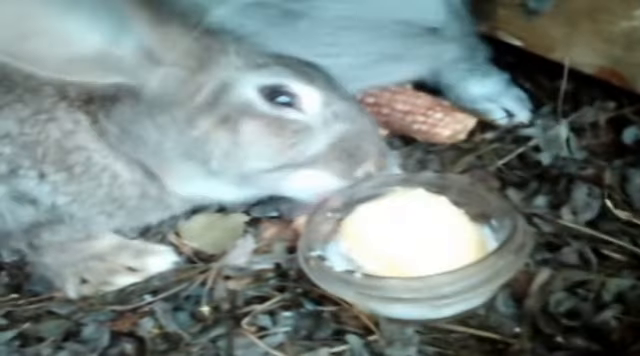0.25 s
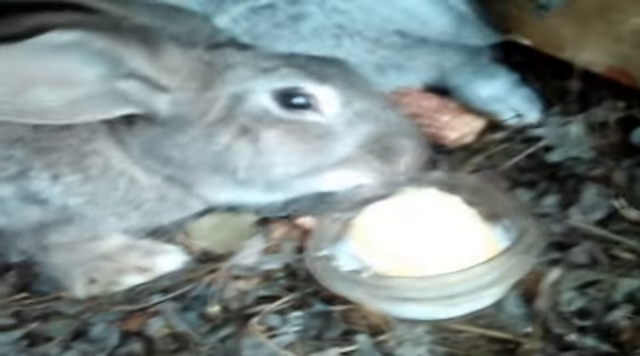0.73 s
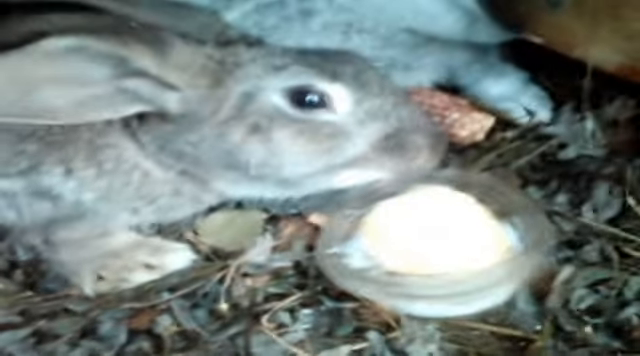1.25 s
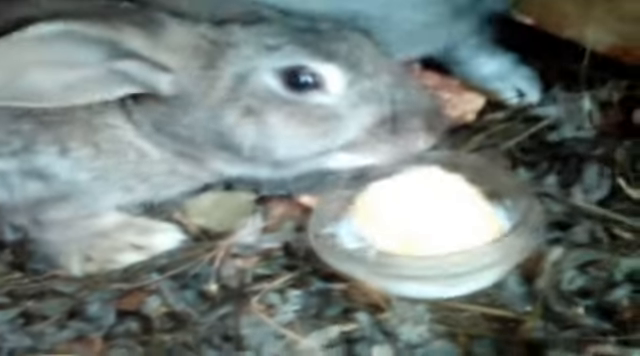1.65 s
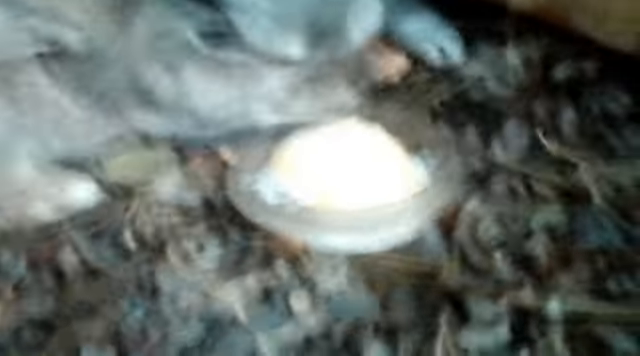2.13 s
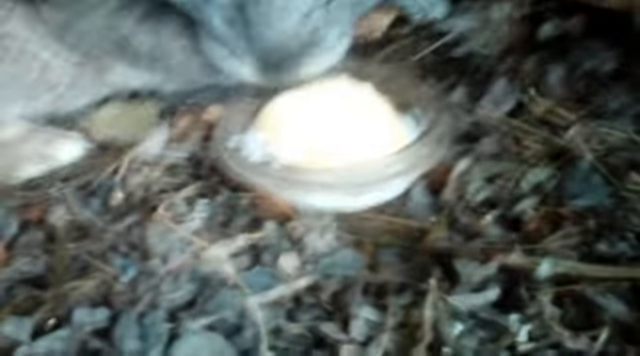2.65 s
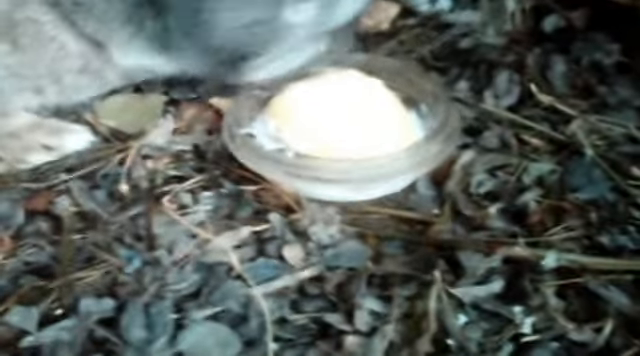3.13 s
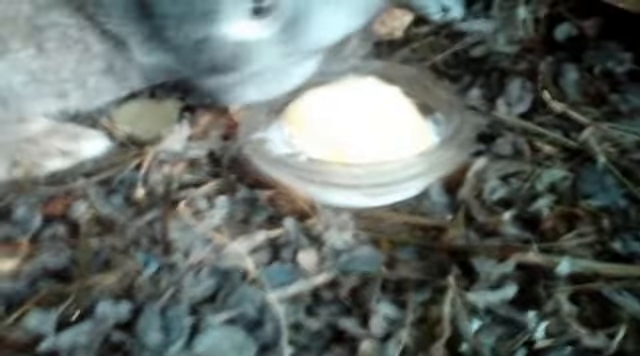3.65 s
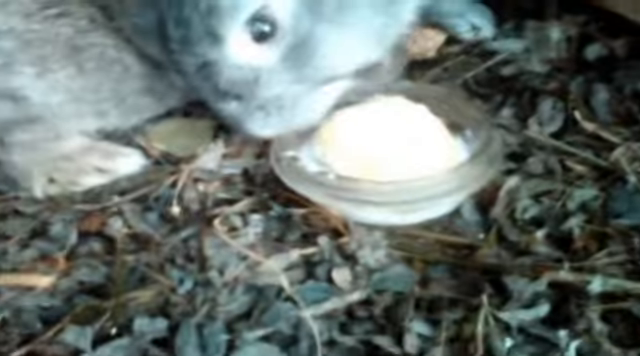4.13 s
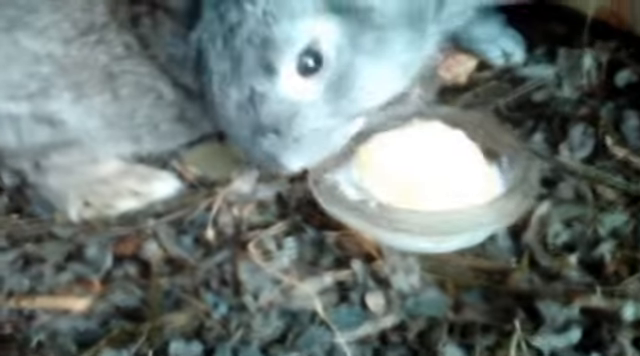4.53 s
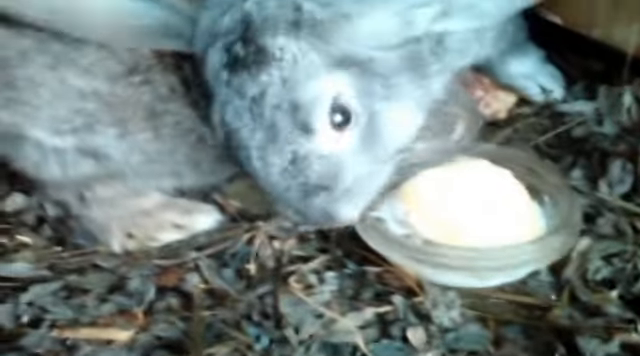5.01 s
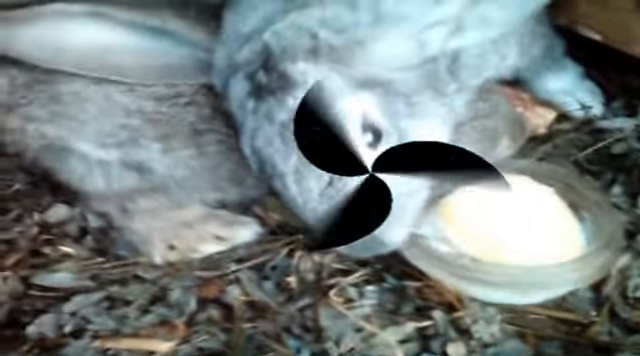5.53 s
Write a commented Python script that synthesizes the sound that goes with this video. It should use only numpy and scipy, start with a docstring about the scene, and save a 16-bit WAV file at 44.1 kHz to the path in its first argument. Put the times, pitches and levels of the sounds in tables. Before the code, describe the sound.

Rabbits gnaw a hard block in a glass dish, with close, dry, scratchy crunching and a few sharp clicks.

```python
"""On leaf litter outdoors, two rabbits gnaw at a salt block in a glass dish, very close to a small camera.
Dry strokes are stick-slip friction: trains of tiny slips swell and fade through a few broad resonances,
as crunchy scrapes, hollow rasps and light swishes. Between them hard edges snap and blunt contacts knock,
some with a brief ring. Faint ticks and soft low thumps sound over quiet air and microphone hiss."""
import sys
import numpy as np
from scipy import signal
from scipy.fft import rfft, irfft, next_fast_len
from scipy.io import wavfile
from scipy.ndimage import map_coordinates

SR = 44100
rng = np.random.default_rng(int(sys.argv[2]) if len(sys.argv) > 2 else 0)


def unload_audio(sound):
    """Save the sound as a 16-bit wav file, at the path given as the first command line argument."""
    columns = np.transpose(np.atleast_2d(sound))
    # keep every value between -1 and 1, then stretch to whole-number steps
    steps = np.round(np.clip(columns, -1, 1) * 32767)
    wavfile.write(sys.argv[1], SR, steps.astype(np.int16))


N = 254456

# Dry, crunchy scrapes: start_s, length_s, grinding_db, brightness_db (hiss over grinding)
CRUNCH_STROKES = [(1.278, 0.041, -53, 2.5), (1.345, 0.05, -56, 4.5), (1.476, 0.059, -48.5, 8),
                  (1.526, 0.058, -56.5, 2), (1.588, 0.045, -51, 4), (1.628, 0.085, -57, 5),
                  (1.694, 0.05, -52.5, 10.5), (1.73, 0.056, -56, 5), (1.958, 0.093, -60.5, 4.5),
                  (2.263, 0.097, -46.5, -7), (2.313, 0.14, -49.5, -2), (2.428, .09, -50.5, -2.5),
                  (2.505, 0.11, -48.5, -4), (2.528, 0.064, -53.5, 11), (3.026, 0.057, -45.5, 4),
                  (3.048, 0.0091, -38, 4), (3.0725, 0.05, -30, 5), (3.101, 0.052, -39.5, 1),
                  (3.246, 0.067, -54, 2), (3.272, 0.069, -54, 11)]
# Spectra of their resonances and of their hiss: frequency_hz, gain_db
CRUNCH_RESONANCES = [(290, -27.5), (500, -22.5), (707, -18.5), (891, 4), (981, -2.5), (1040, -6),
                     (1530, 2.5), (1850, -5), (2060, -6), (2310, -14), (2860, -7.5), (3670, -8),
                     (4500, -20), (5000, -13), (6500, 1), (11000, -120)]
CRUNCH_HISS_SPECTRUM = [(4000, -12.5), (4600, -20.5), (7100, -6), (8200, -10.5), (9400, -20), (12000, -12),
                        (13800, -26), (15800, -29)]


def crunches():
    """Stick-slip friction: dry, crunchy scrapes close to the microphone, each catching early."""
    levels = stroke_envelopes(CRUNCH_STROKES, rise_share=0.25, scratch=(-0.73, 0.5), shudder=(-12.5, -0.88))
    return scrape(levels, CRUNCH_RESONANCES, CRUNCH_HISS_SPECTRUM, level_db=0, judder_db=1.5, spread_db=2)


# Rasping strokes: start_s, length_s, grinding_db, brightness_db
RASP_STROKES = [(2.06, 0.083, -64, -2.5), (2.632, 0.075, -60.5, 11), (2.678, .08, -57.5, 9),
                (2.785, .11, -56, 11.5), (2.861, .056, -47, 6), (2.898, 0.12, -55, 4.5),
                (2.967, 0.12, -53.5, 9.5), (3.138, 0.075, -51, 1.5), (3.326, 0.056, -52.5, 4),
                (3.48, 0.09, -54.5, 7.5), (3.56, 0.048, -56.5, 9.5), (3.625, 0.07, -50, 2.5),
                (3.669, 0.071, -43, 5), (3.822, 0.048, -58.5, -0.5), (3.953, .036, -58.5, 2.5),
                (4.006, .048, -60.5, -3), (4.1, 0.059, -61, 1), (4.365, .099, -69.5, 1.5),
                (5.696, 0.066, -61, 3)]
# Spectra of their resonances and of their hiss: frequency_hz, gain_db
RASP_RESONANCES = [(290, -61), (500, -38), (578, -11.5), (757, -16.5), (891, -2.5), (991, -5.5), (1190, -3),
                   (1420, -11.5), (1680, 4.5), (2140, -12), (2780, -8.5), (3430, -11.5), (3820, -5),
                   (5000, -15), (6500, -38), (11000, -120)]
RASP_HISS_SPECTRUM = [(2350, -51), (4000, -15), (4810, -13), (6260, -1), (7660, 0), (9690, -7.5),
                      (11300, -6), (13100, -20), (14800, -10.5), (15800, -36)]


def rasps():
    """Forced resonance: friction without judder drives midrange peaks, which sound hollow."""
    levels = stroke_envelopes(RASP_STROKES, rise_share=0.35, scratch=(-5.5, 0.18), shudder=(-21.5, 0.25))
    return scrape(levels, RASP_RESONANCES, RASP_HISS_SPECTRUM, level_db=0.2, judder_db=0, spread_db=1.5)


# Brushing strokes: start_s, length_s, grinding_db, brightness_db
SWISH_STROKES = [(.222, .026, -68, 14.5), (.685, 0.13, -66.5, 7.5), (.883, 0.063, -66.5, 8.5),
                 (1.752, 0.13, -55, 12), (1.874, .075, -54, 1.5), (1.903, 0.063, -45.5, 6.7),
                 (2.2, 0.085, -46, 3), (3.71, 0.086, -66.5, 5.5), (5.695, 0.057, -73, 18)]
# Spectra of their resonances and of their hiss: frequency_hz, gain_db
SWISH_RESONANCES = [(300, -22), (600, -11.5), (900, 0.5), (1150, -2.5), (1500, 1), (2300, -2.5), (3500, 7),
                    (4600, 3.5), (7000, 20)]
SWISH_HISS_SPECTRUM = [(4000, -5), (6500, 2), (9000, 1), (10300, -3), (12000, -5), (15800, -12.5)]


def swishes():
    """Light sliding friction: slips of nearly equal size blend into a swish that peaks late."""
    levels = stroke_envelopes(SWISH_STROKES, rise_share=0.7, scratch=(-1.3, 0.5), shudder=(-16, -0.87))
    return scrape(levels, SWISH_RESONANCES, SWISH_HISS_SPECTRUM,
                  level_db=-0.1, judder_db=1.3, spread_db=-0.5)


# Low shudder under every stroke: frequency_hz, gain_db
SHUDDER_SPECTRUM = [(40, -43), (90, -5), (220, -1), (340, -2), (480, -6.5), (800, -0.5), (1500, -59)]


def scrape(levels, resonances, hiss_spectrum, level_db, judder_db, spread_db):
    """Source and filter: one friction force excites four bands; judder is the contact catching."""
    force = reflected(slips(rate_hz=3500, spread_db=spread_db, rubbing=0.79), wall_db=-12.5, t60_s=0.032)
    judder = unit(amp(judder_db * np.tanh(wobble(190))))
    grinding = coloured(force, resonances, high_hz=2300)
    scratch = coloured(force, resonances, low_hz=2445, high_hz=4510)
    hiss = coloured(force, hiss_spectrum, low_hz=4630)
    shudder = coloured(force, SHUDDER_SPECTRUM)
    return amp(level_db) * judder * np.sum(levels * [grinding, scratch, hiss, shudder], axis=0)


def stroke_envelopes(strokes, rise_share, scratch, shudder):
    """Incoherent addition: strokes swell and fade in arches whose powers add in each of four bands."""
    t, power = np.arange(N) / SR, np.zeros((4, N))
    for start_s, length_s, grinding_db, brightness_db in strokes:
        active = (t > start_s) & (t < start_s + length_s)
        progress = (t[active] - start_s) / length_s
        arch = np.sin(np.interp(progress, [0, rise_share, 1], [0, np.pi / 2, np.pi]))
        # Each pair is (dB over the grinding, dB per dB of brightness).
        scratch_db = scratch[0] + scratch[1] * brightness_db
        shudder_db = shudder[0] + shudder[1] * brightness_db
        bands_db = grinding_db + np.array([0, scratch_db, brightness_db, shudder_db])
        power[:, active] += np.outer(amp(bands_db), arch) ** 2
    return np.sqrt(power)


def slips(rate_hz, spread_db, rubbing):
    """Shot noise: tiny slips of uneven size occur at random over smooth rubbing."""
    pulses = (rng.random(N) < rate_hz / SR) * rng.choice([-1, 1], N)
    sizes = amp(spread_db * np.clip(rng.standard_normal(N), -2, 2))
    return unit(unit(pulses * sizes) + rubbing * rng.standard_normal(N))


# Hard edges giving way: start_s, level_db
SNAP_EVENTS = [(1.2822, -14.5), (1.284, -30), (1.2975, -31), (1.478, -30), (1.4922, -17), (3.0091, -33)]
# Spectrum of a snap: frequency_hz, gain_db
SNAP_SPECTRUM = [(100, -11), (500, -9), (1000, -4), (1700, 0), (2400, -3), (3600, 3), (6000, 0.5),
                 (8000, -8), (11000, -21), (15500, -28)]


def snaps(rattle_db=-28, t60_s=0.013):
    """Brittle fracture: an edge gives way in one sharp pulse and a short rattle of crumbs."""
    track, t = np.zeros(N), np.arange(SR // 16) / SR
    for start_s, level_db in SNAP_EVENTS:
        force = amp(rattle_db - 60 * t / t60_s) * rng.standard_normal(len(t))
        force[0] = 1  # the break itself
        add(track, start_s, amp(level_db) * force)
    return signal.fftconvolve(track, impulse(SNAP_SPECTRUM))[:N]


# Blunt contacts: start_s, level_db, edge_db (relative to the thud)
KNOCK_EVENTS = [(3.009, -23, -8), (3.0108, -24.5, -11), (4.8463, -33.5, -36), (5.3519, -35.5, -38),
                (5.6984, -36.5, -24)]
# Modes that a knock excites: centre_hz, bandwidth_hz, gain_db
KNOCK_RESONANCES = [(195, 170, 13.5), (430, 240, 6.5), (910, 530, 6.5), (1700, 160, 8.5), (3320, 1000, -12)]


def knocks(rattle_db=-25, t60_s=0.062):
    """Impact excitation: a short push rings low, well damped modes, and grit adds a thin bright edge."""
    track, t = np.zeros(N), np.arange(SR // 16) / SR
    modes = lambda hz: sum(amp(db) * resonance(hz, centre, width) for centre, width, db in KNOCK_RESONANCES)
    for start_s, level_db, edge_db in KNOCK_EVENTS:
        grit = amp(-60 * t / t60_s) * rng.standard_normal(len(t))
        thud = filtered((t == 0) + amp(rattle_db) * grit, modes)
        thud /= np.abs(thud).max()
        edge = filtered(grit, lambda hz: gain(RASP_HISS_SPECTRUM, hz))
        add(track, start_s, amp(level_db) * (thud + amp(edge_db) * edge))
    return track


# Faint dry ticks, rustles and the brief high ring after a knock: start_s, level_db, pitch_hz, quality_factor
TICK_EVENTS = [(.076, -56, 6740, 3.7), (0.112, -49, 6730, 4), (0.119, -48, 7100, 2.8),
               (.236, -50, 6500, 0.96), (0.286, -53, 2900, .8), (.301, -47, 3500, 0.59),
               (.324, -52, 6000, 0.77), (0.35, -58, 7000, 0.81), (.426, -54, 7060, 0.84),
               (0.503, -54, 7350, 1), (.515, -53, 2730, 3.4), (.799, -57, 900, 1.3), (.916, -44, 7000, .8),
               (2.151, -50, 7250, 0.71), (4.015, -49, 5960, 0.88), (4.747, -60, 8350, 1.4),
               (4.852, -59, 3500, 3.5), (5.354, -56, 7150, 0.61)]


def ticks(attack_s=0.0008, reference_t60_s=0.047, reference_db=-52, halving_db=5.5):
    """Decaying resonant noise: a hard tick is short, a weak one lingers as a rustle or a brief ring."""
    track, t = np.zeros(N), np.arange(SR // 8) / SR
    for start_s, level_db, pitch_hz, quality in TICK_EVENTS:
        t60_s = reference_t60_s * 0.5 ** ((level_db - reference_db) / halving_db)
        band = lambda hz: resonance(hz, pitch_hz, pitch_hz / quality) ** 2
        crackle = unit(filtered(rng.standard_normal(len(t)), band))
        envelope = amp(level_db - 60 * t / t60_s) * (1 - np.exp(-t / attack_s))
        add(track, start_s, envelope * crackle)
    return track


# Soft low thumps and the low ring after two knocks: start_s, level_db (before the boost), pitch_hz, t60_s
THUMP_EVENTS = [(.294, -51.5, 85, 0.059), (0.425, -54, 84.4, 0.087), (2.541, -49, 232, 0.034),
                (4.846, -48, 430, 0.032), (4.912, -56, 99, 0.052), (5.351, -52, 201, 0.044)]


def thumps(boost_db=4, attack_s=0.0012):
    """Damped oscillation: each soft thump or low ring is one decaying sinusoid."""
    track, t = np.zeros(N), np.arange(SR // 5) / SR
    for start_s, level_db, pitch_hz, t60_s in THUMP_EVENTS:
        envelope = amp(level_db + boost_db - 60 * t / t60_s) * (1 - np.exp(-t / attack_s))
        add(track, start_s, envelope * np.sin(2 * np.pi * pitch_hz * t))
    return track


# Spectrum of still air and microphone hiss: frequency_hz, gain_db
AIR_SPECTRUM = [(25, 11.5), (55, 0), (120, -0.5), (220, -2.5), (500, -5.5), (1000, -8.5), (2000, -11.5),
                (7000, -15), (15800, -19.5)]
# Slow course of their level: time_s, level_db
AIR_ENVELOPE = [(0, -60), (1.4, -61.5), (5.0, -61.5), (5.77, -64.5)]


def background(whine_hz=12897, whine_db=-86):
    """Noise floor: broadband outdoor air and microphone hiss, with a thin electronic whine."""
    level_db = np.interp(np.arange(N) / SR, *np.transpose(AIR_ENVELOPE)) + 0.22 * wobble(8.6)
    air = amp(level_db) * coloured(rng.standard_normal(N), AIR_SPECTRUM)
    pitch_hz = whine_hz + 6 * wobble(30)
    whine = unit(np.sin(2 * np.pi * np.cumsum(pitch_hz) / SR))
    return air + amp(whine_db) * whine


def reflected(x, wall_db, t60_s):
    """Early reflections: the dish and the ground return dense echoes that quickly decay."""
    t = np.arange(SR // 25) / SR
    echoes = rng.standard_normal(len(t)) * amp(-60 * t / t60_s) * (t > 0.001)
    return x + amp(wall_db) * signal.fftconvolve(x, echoes / np.linalg.norm(echoes))[:N]


def resonance(hz, centre_hz, width_hz):
    """Damped harmonic oscillator: the causal response of one mode."""
    return 1j * hz * width_hz / (centre_hz ** 2 - hz ** 2 + 1j * hz * width_hz)


def impulse(spectrum, size=2048):
    """Minimum phase: a folded cepstrum gives the sharpest causal click with this spectrum, at peak 1."""
    cepstrum = irfft(np.log(gain(spectrum, np.fft.rfftfreq(size, 1 / SR))))
    cepstrum[1:size // 2] *= 2
    cepstrum[size // 2 + 1:] = 0
    click = irfft(np.exp(rfft(cepstrum)))
    return click / np.abs(click).max()


def coloured(x, spectrum, low_hz=1, high_hz=SR):
    """Spectral shaping between two soft band edges, at rms 1."""
    edges = lambda hz: ((1 + (low_hz / (hz + 1)) ** 16) * (1 + (hz / high_hz) ** 16)) ** -0.5
    return unit(filtered(x, lambda hz: gain(spectrum, hz) * edges(hz)))


def filtered(x, response):
    """Linear filtering: the spectrum is multiplied by a frequency response."""
    size = next_fast_len(len(x) + 8192)
    return irfft(rfft(x, size) * response(np.fft.rfftfreq(size, 1 / SR)), size)[:len(x)]


def gain(spectrum, hz):
    """Interpolation of (frequency_hz, gain_db) points on a log axis, as amplitude."""
    points_hz, points_db = np.transpose(spectrum)
    return amp(np.interp(np.log(hz + 1), np.log(points_hz + 1), points_db))


def wobble(rate_hz):
    """Smooth random modulation: a spline through rate_hz random knots a second."""
    knots = rng.standard_normal(int(N * rate_hz / SR) + 4)
    return map_coordinates(knots, [np.arange(N) * rate_hz / SR])


def amp(db):
    """Decibels as an amplitude ratio."""
    return 10 ** (np.asarray(db) / 20)


def unit(x):
    """Normalisation to rms 1."""
    return x / np.sqrt(np.mean(x ** 2) + 1e-20)


def add(track, start_s, sound):
    """Superposition of a sound on the track from start_s."""
    span = track[round(start_s * SR):][:len(sound)]
    span += sound[:len(span)]


def scene():
    """Superposition at one microphone: every source is close and nearly dry."""
    impacts = reflected(snaps() + knocks(), wall_db=-13, t60_s=0.054)
    strokes = crunches() + rasps() + swishes()
    return (strokes + impacts + ticks() + thumps() + background())[None]


def record(dry, low_hz=42, top_hz=15600):
    """Band limiting: the camera drops the deepest bass and the highest treble."""
    passband = lambda hz: (hz < top_hz) * (1 - 1 / (1 + (hz / low_hz) ** 8))
    return filtered(dry[0], passband)[None]


dry = scene()
out = record(dry)
unload_audio(out)
```